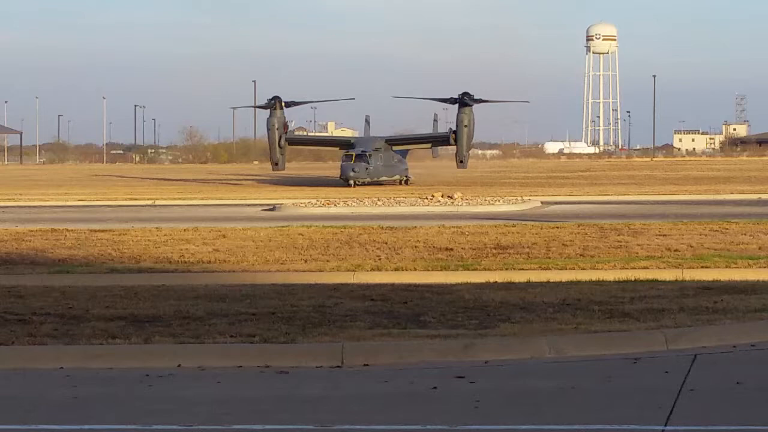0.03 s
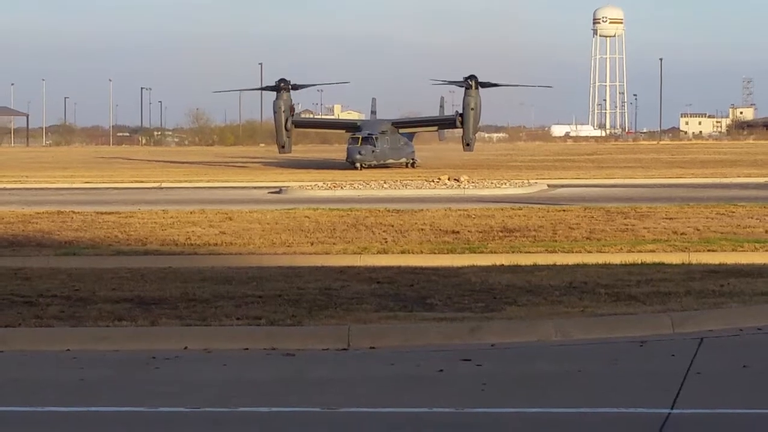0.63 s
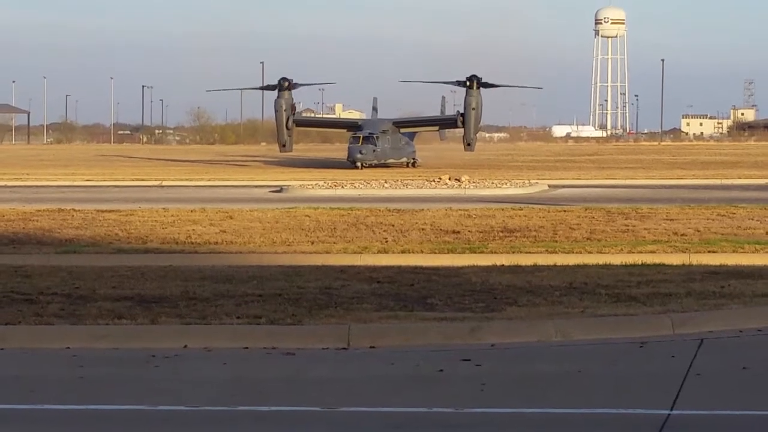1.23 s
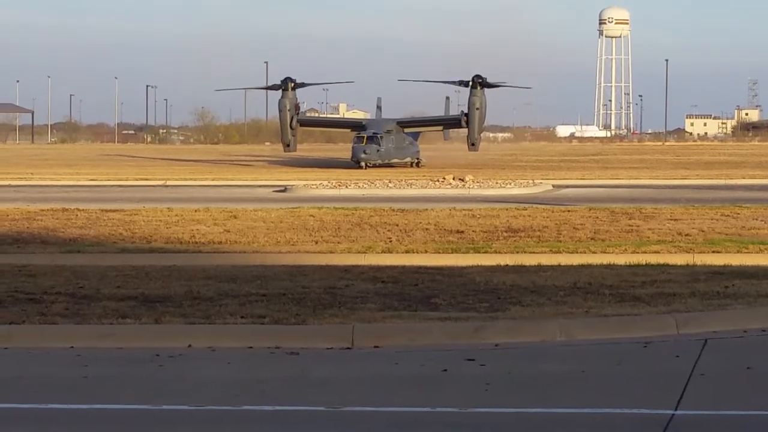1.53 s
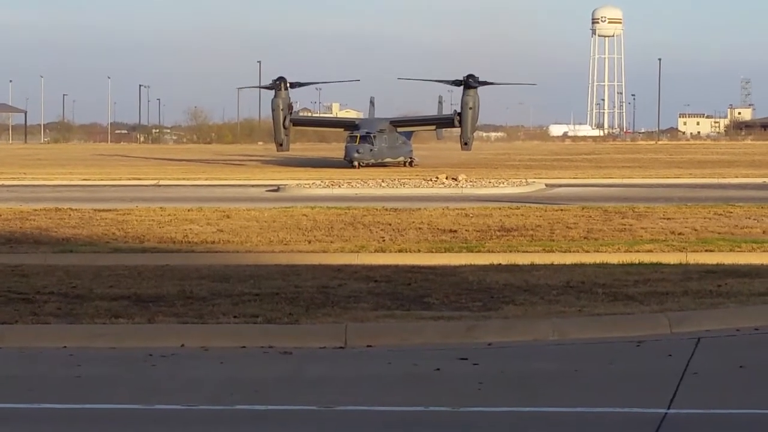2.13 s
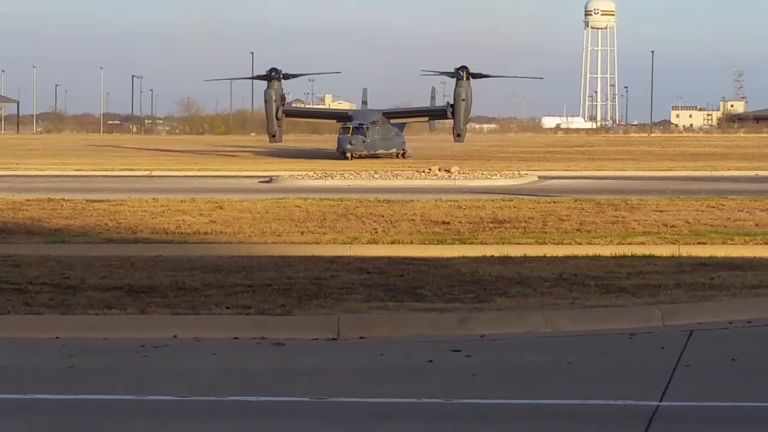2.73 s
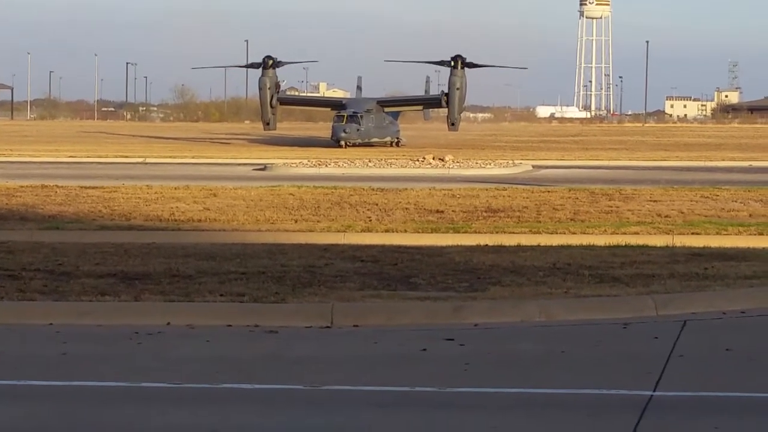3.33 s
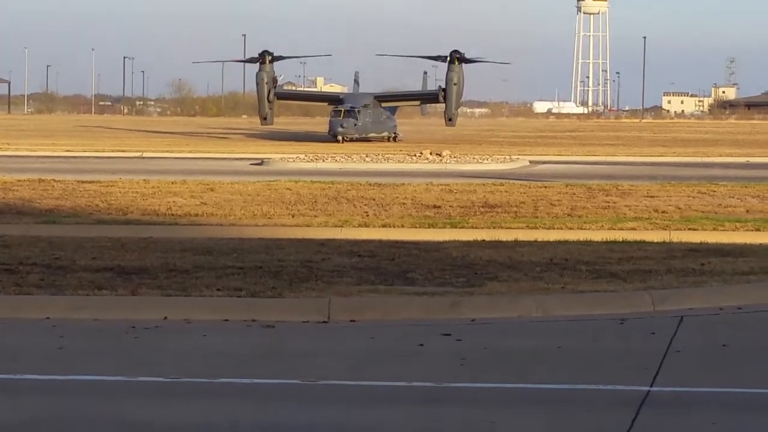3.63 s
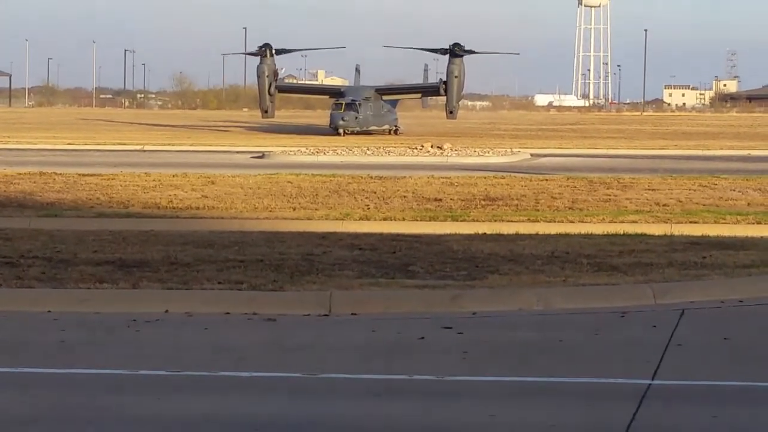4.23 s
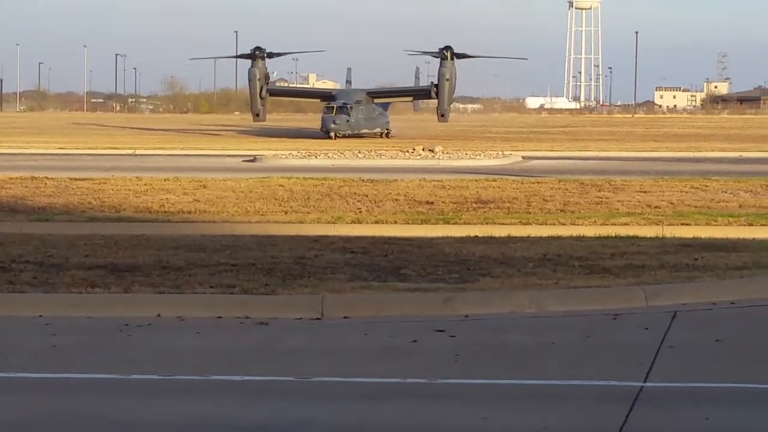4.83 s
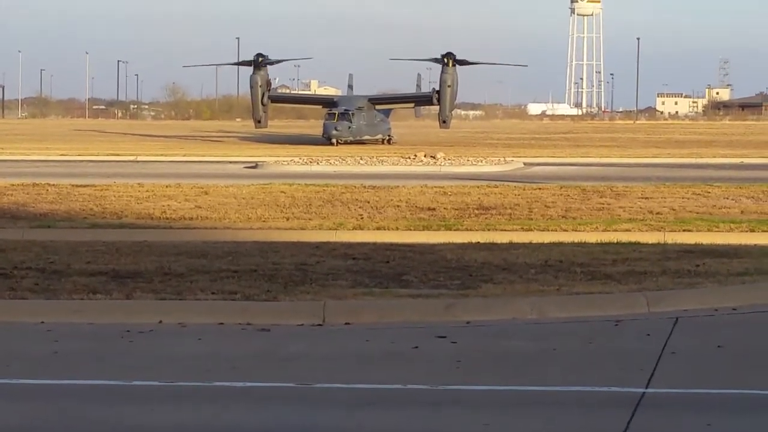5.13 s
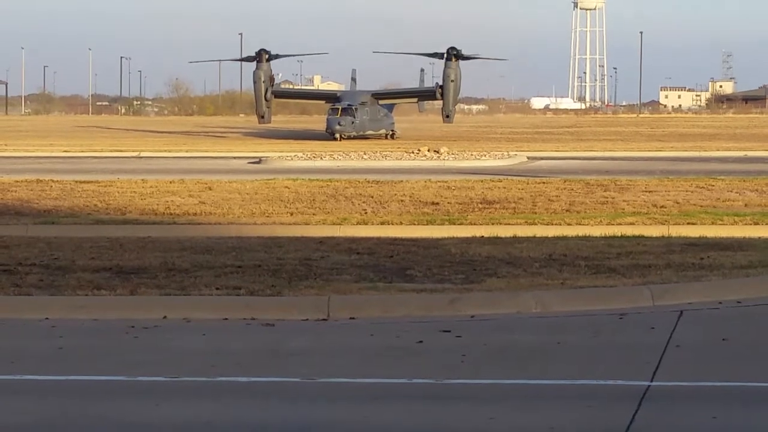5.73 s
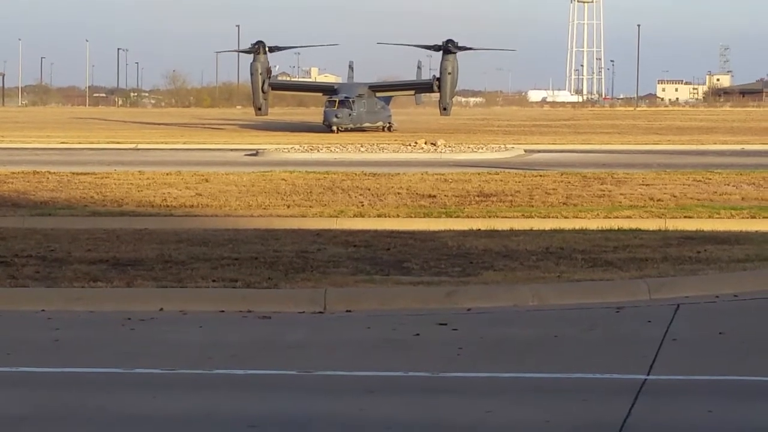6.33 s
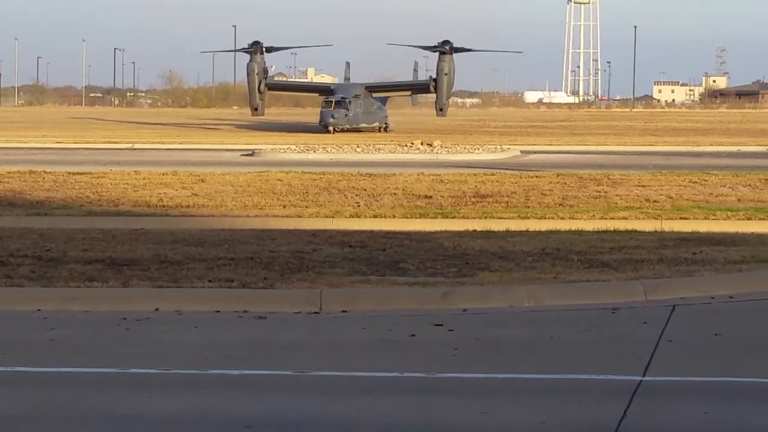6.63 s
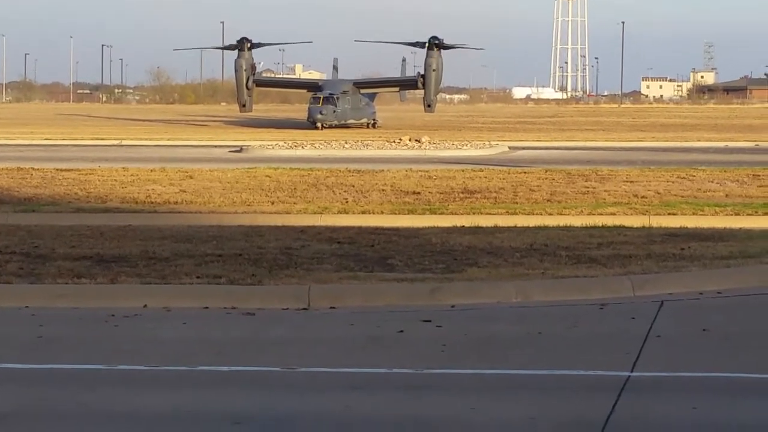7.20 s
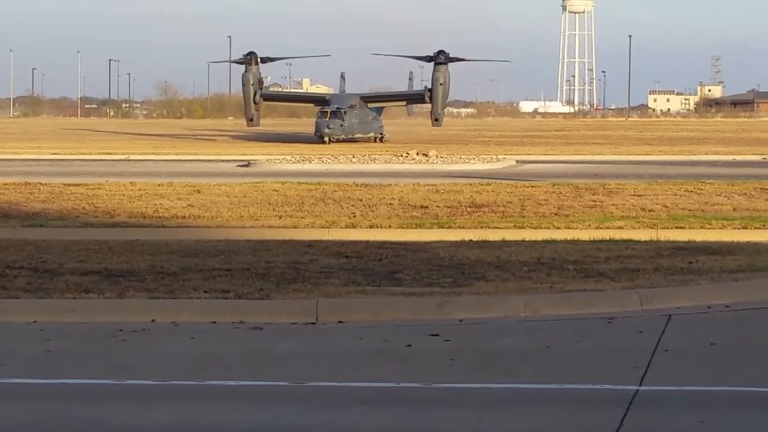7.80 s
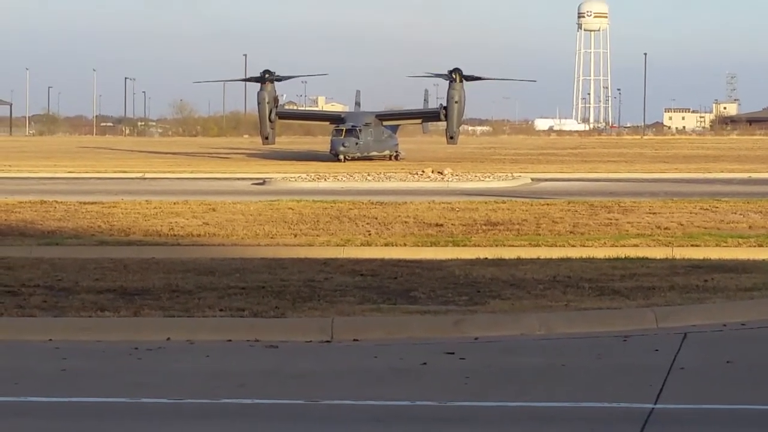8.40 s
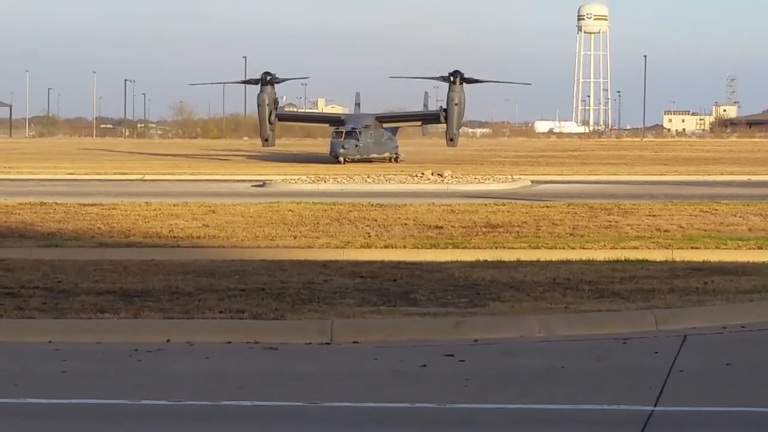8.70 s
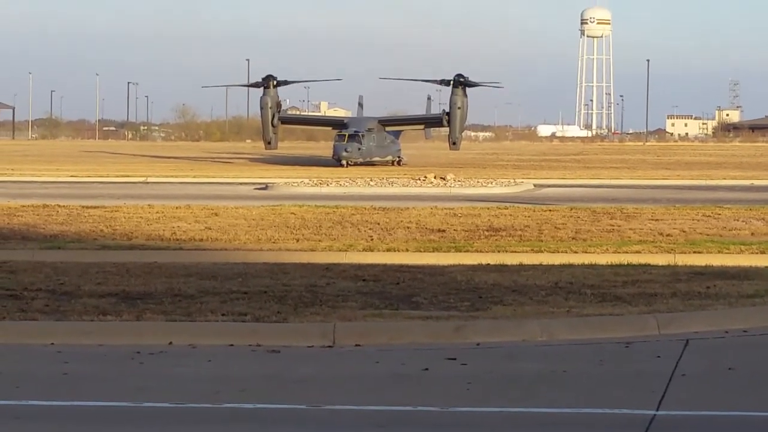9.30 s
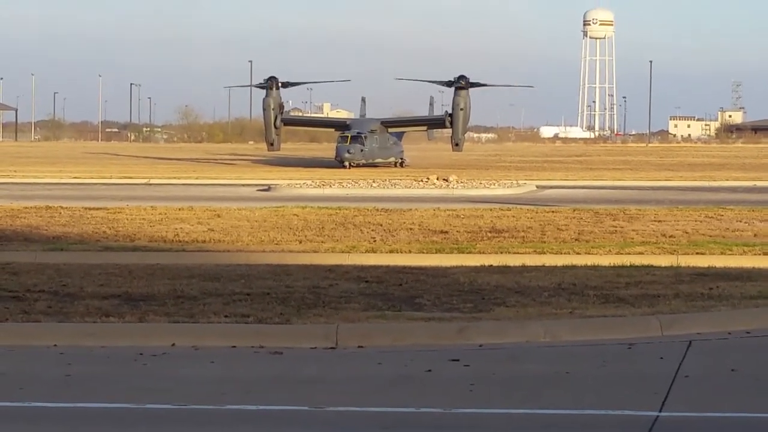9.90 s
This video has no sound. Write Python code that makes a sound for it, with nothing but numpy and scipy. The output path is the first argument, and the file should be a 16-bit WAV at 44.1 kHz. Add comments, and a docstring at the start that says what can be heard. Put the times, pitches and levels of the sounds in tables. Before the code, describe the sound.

After a quick fade-in, the deep, rapid, uneven beat of a tiltrotor aircraft's rotors carries steadily across an open field. Rushing air and turbine hiss sit behind it, with a thin whine that weakens after a few seconds. The blade slaps swell and ease, cracking hardest just past the middle, right after a small click. Wind rumbles softly on the microphone, and the distant rush sounds slightly hollow.

```python
"""A tiltrotor idles some way off on an airfield, its two three-blade rotors thumping in a limping gallop.
Each passing blade pushes out a pulse of air, chops up eddies, swishes and slaps. A shifting crosswind
brings out now one rotor, now the other. Behind them the air pouring off the rotors roars, the turbines
hiss and whine, and a breeze rumbles on the microphone.
The sound fades in at the start, and the beat skips once with a small click."""
import sys
import numpy as np
from scipy import signal
from scipy.fft import rfft, irfft, next_fast_len
from scipy.io import wavfile
from scipy.ndimage import uniform_filter1d, minimum_filter1d

SR = 44100
rng = np.random.default_rng(int(sys.argv[2]) if len(sys.argv) > 2 else 0)


def master_out(mix):
    """Clip the mix to full scale and print it as 16-bit PCM to the path in sys.argv[1]."""
    frames = np.transpose(np.atleast_2d(mix))
    ceiling = np.clip(frames, -1, 1)
    pcm = np.round(ceiling * 32767).astype(np.int16)
    wavfile.write(sys.argv[1], SR, pcm)


N = 438794
TIME = np.arange(N) / SR
FFT_SIZE = next_fast_len(N, real=True)
FREQS = np.fft.rfftfreq(FFT_SIZE, 1 / SR)
SKIP_AT_S, SKIP_LENGTH_S = 5.4233, .0232

# how often a blade of one rotor goes by: (time [s], rate [passes a second])
BLADE_RATE = [(0, 20.52), (1, 20.51), (2, 20.477), (5, 20.477), (7, 20.492), (8, 20.5), (10, 20.5)]
# tone colour of rushing air, before the microphone shapes it: (frequency [Hz], level [dB])
RUSH_COLOUR = [(250, -34.5), (450, -2), (650, 2.5), (1500, 1.5), (1900, -3), (2400, -25.5), (6000, -34.5)]
# tone colour of a blade slap, before the microphone shapes it: (frequency [Hz], level [dB])
SLAP_COLOUR = [(500, -7), (1300, -5), (2000, 7.5), (4200, 8.5), (6500, 5), (10000, 3), (11500, -19.5),
               (14000, -44)]


def rotors(gusty_db):
    """Two rotors geared to one speed; their blades are out of step, so the beat limps."""
    # each rotor in still air: (swish [dB], slap [dB], throb [dB], share of the crosswind's lift [factor])
    still_air = [(-27, -24.7, -23.5, 0.76), (-26, -26, -24, -0.67)]
    # the wind lifts one rotor's noise and sinks the other's: (time [s], lift toward the first rotor [dB])
    crosswind = [(.8, -4), (1.8, -.5), (2.6, 3.5), (3.45, 7), (4.1, 2), (4.8, -4.5), (6.1, -6.5), (6.9, -1),
                 (7.8, 0), (8.4, 5), (9.8, 3)]
    # a rotor slaps harder in its own wake; one list a rotor: (start [s], end [s], boost [dB])
    wake_spells = [
        [(.95, 2.505, 5)],
        [(.5, 1.9, 5), (4.35, 5.22, 5.5), (5.3, 5.76, 8)],
    ]
    # how much the air around the rotors churns: (time [s], throb boost [dB])
    churn = [(.8, 0.7), (2.8, -1), (3.6, -1), (4.9, -0.1), (5.6, -0.4), (6.4, 1), (9.6, 0.1)]
    # one gust thickens the throb of both rotors: (start [s], end [s], boost [dB])
    gust = [(7.95, 8.45, 3)]
    first_passes = (.733, 1.157)  # in blade cycles, like width, lead and lag below
    throb_gain = amp(curve(churn) + spell_db(gust))
    bass, air = np.zeros(N), np.zeros((2, N))
    for first, (swish_db, slap_db, throb_db, share), spells in zip(first_passes, still_air, wake_spells):
        passes = blade_count() - first
        wind_db = share * curve(crosswind) + gusty_db * wander(2.5)
        bass += thump(passes, bass_cut_hz=20, sway_db=-0.35)
        bass += throb_gain * throb(passes, throb_db, memory=0.57, width=0.16, steady=0.47, lag=0.017)
        air += swish(passes, swish_db + wind_db, lead=0.071, width=0.1, flutter_db=1.25)
        air += slap(passes, slap_db + wind_db + spell_db(spells), lead=0.038, width=0.058, flutter_db=1.1)
    return bass * amp([[-.5], [.5]]) + air  # the bass leans slightly right


def thump(passes, bass_cut_hz, sway_db):
    """Each blade pushes out one smooth pulse; the microphone's bass cut adds a dip after it."""
    # the pure tones that make up the pulse: (frequency [Hz], level [dB])
    pulse_colour = [(20, -36), (41, -26), (61, -21.5), (82, -17.5), (102, -20), (123, -22), (143, -26),
                    (164, -26.5), (184, -38.5), (225, -47), (290, -58.5), (400, -63.5)]
    harmonics = np.arange(1, 20)
    hz = harmonics * np.mean(curve(BLADE_RATE))
    cycle = np.linspace(0, 1, 2048)
    angles = 2 * np.pi * np.outer(cycle, harmonics) + np.arctan(bass_cut_hz / hz)
    pulse = np.cos(angles) @ amp(colour_db(pulse_colour, hz))
    return np.interp(passes % 1, cycle, pulse) * amp(sway_db * wander(2.2))


def throb(passes, level_db, memory, width, steady, lag):
    """Blades cutting through swirling air make a low, rough throb."""
    # tone colour of the chopped eddies: (frequency [Hz], level [dB])
    eddy_colour = [(10, -28.5), (30, -26), (60, -5), (105, 0), (145, -0.5), (185, 0.5), (270, -7),
                   (330, -14.5), (420, -20.5), (560, -30.5), (800, -49), (2000, -83)]
    chopped = repeating_noise(memory)[0] * (steady + bell(passes - lag, width))
    return amp(level_db) * coloured(chopped, eddy_colour)


def swish(passes, level_db, lead, width, flutter_db):
    """A soft rush of air comes as each blade swings toward the listener."""
    burst = bell(passes + lead, width) * amp(level_db + flutter_db * wander(8.7))
    return at_microphone(repeating_noise(memory=0.45) * burst, RUSH_COLOUR)


def slap(passes, level_db, lead, width, flutter_db):
    """Each blade tip hits the whirl of air left by the one before, with a short, bright slap."""
    burst = bell(passes + lead, width) * amp(level_db + flutter_db * wander(15))
    return at_microphone(white_noise() * burst, SLAP_COLOUR)


def hard_slaps(level_db, delay_s, width_s):
    """A few blades hit a whirl of air squarely and stand out as cracks."""
    # the square hits: (time [s], relative peak level [dB])
    hits = [(2.201, -11.5), (2.3243, -11), (2.422, -14), (5.1303, -16), (5.5463, -12), (5.5934, -1.5),
            (5.839, -12), (5.938, -10)]
    burst = sum(amp(level_db + db) * np.exp(-.5 * ((TIME - at - delay_s) / width_s) ** 2)
                for at, db in hits)
    return at_microphone(white_noise() * burst, SLAP_COLOUR)


def downwash(level_db, flutter_db):
    """Air pours off the rotors, its level trembling on the way across the field."""
    # strength of the rush: (time [s], relative level [dB])
    strength = [(.8, -27.5), (1.7, -31.5), (2.6, -34.5), (4.0, -27.5), (4.8, -27), (5.6, -31.5), (6.8, -32),
                (7.5, -32), (9.6, -32.5)]
    gain = amp(level_db + curve(strength) + flutter_db * wander(23))
    return at_microphone(white_noise() * gain, RUSH_COLOUR)


def turbines(level_db, flutter_db):
    """The engines hiss, and their compressors add three thin whines."""
    # strength of the hiss: (time [s], relative level [dB])
    strength = [(.8, -25.5), (1.6, -27), (2.7, -29), (3.6, -27.5), (5.4, -28), (6.6, -29.5), (7.9, -28.5),
                (8.35, -27), (8.9, -29)]
    # tone colour of the hiss, before the microphone shapes it: (frequency [Hz], level [dB])
    hiss_colour = [(600, -22.5), (1400, -5), (1900, -3.5), (2200, 0), (3000, 0), (6000, 1), (10000, 2),
                   (10700, -16.5), (11800, -38), (14000, -53)]
    # compressor whine carried on the wind: (time [s], level [dB])
    whine_levels = [(0, -28), (.8, -36), (1.5, -33), (2, -33), (2.5, -36.5), (3.1, -54), (5, -56.5),
                    (10, -53)]
    gain = amp(level_db + curve(strength) + flutter_db * wander(23))
    hiss = at_microphone(white_noise() * gain, hiss_colour)
    whine_db = curve(whine_levels)
    return hiss + whine(2026, whine_db) + whine(1978, whine_db - 8) + whine(2221, -42.0)


def whine(hz, level_db, drift_hz=2.65, fading_db=3):
    """One compressor tone that wavers in pitch and loudness."""
    cycles = np.cumsum(hz + drift_hz * wander(5.4)) / SR
    return amp(level_db + fading_db * wander(5.3)) * np.sin(2 * np.pi * cycles)


def breeze(level_db, gusty_db):
    """Air blowing over the microphone makes a lumpy rumble, unrelated left and right."""
    # tone colour of the rumble: (frequency [Hz], level [dB])
    rumble_colour = [(12, -33), (27, -18.5), (42, -7.5), (80, -5.5), (140, -4.5), (200, -14.5), (280, -20),
                     (400, -28), (800, -51.5), (2000, -93.5)]
    return coloured(white_noise(), rumble_colour) * amp(level_db + gusty_db * wander(6.7))


def skip_click(level_db, decay_s):
    """A small, sharp click where the beat skips."""
    age = TIME - SKIP_AT_S
    return amp(level_db) * (age >= 0) * np.exp(-abs(age) / decay_s)


def at_microphone(noises, colour):
    """Gives two noises a tone colour, plus the hollow sound of the microphone's two openings."""
    # how the openings hear distant noise:
    # (frequency [Hz], left level [dB], right level [dB], likeness [0-1], left lead [radians])
    openings = [(450.0, -10.7, -10.7, 0.84, 0.1), (570.0, -14.9, -13.2, 0.74, -0.1),
                (760.0, -5.6, -3.4, 0.96, -0.0), (1180.0, -7.0, -3.9, 0.92, 0.1),
                (1430.0, -13.6, -9.7, 0.51, 0.2), (1620.0, -10.3, -8.8, 0.56, 0.8),
                (1880.0, -13.3, -13.9, 0.37, -3.1), (2020.0, -5.2, -6.1, 0.74, -0.6),
                (2230.0, -0.1, -1.7, 0.94, -0.3), (2420.0, -2.9, -4.3, 0.9, -0.3),
                (2650.0, -11.1, -9.0, 0.75, -0.2), (2850.0, -19.8, -9.7, 0.3, 1.1),
                (3250.0, -20.1, -6.4, 0.7, -1.9), (3750.0, -26.1, -8.2, 0.58, -2.5),
                (4250.0, -23.8, -6.2, 0.79, 0.1), (4650.0, -28.6, -13.2, 0.34, -2.8),
                (4950.0, -26.1, -15.5, 0.62, 1.1), (5450.0, -27.9, -22.1, 0.18, -1.1),
                (5900.0, -28.0, -18.1, 0.29, 2.0), (6450.0, -20.7, -14.5, 0.72, -0.1),
                (6900.0, -24.1, -17.5, 0.6, -0.4), (7250.0, -29.6, -26.9, 0.19, 2.0),
                (7800.0, -31.4, -20.1, 0.46, -0.3), (8250.0, -31.2, -28.3, 0.21, -2.8),
                (8800.0, -38.9, -24.6, 0.2, 0.3), (9400.0, -34.1, -32.9, 0.18, -2.0),
                (9900.0, -36.8, -36.3, 0.18, 1.7), (10600.0, -51.1, -43.4, 0.2, 0.1)]
    hz, _, _, likeness, lead = np.transpose(openings)
    shared = np.interp(FREQS, hz, np.clip(likeness, 0, .99) * np.exp(-1j * lead))
    sides_db = [colour_db(openings, FREQS, column) for column in (1, 2)]
    gains = evened(amp(sides_db + colour_db(colour, FREQS)))
    left, other = rfft(noises, FFT_SIZE)
    right = shared * left + np.sqrt(1 - abs(shared) ** 2) * other  # partly the same noise as the left
    return irfft(gains * [left, right], FFT_SIZE)[:, :N]


def blade_count():
    """Counts blade passes from the start, jumping ahead where the beat skips."""
    rate = curve(BLADE_RATE)
    return np.cumsum(rate) / SR + rate.mean() * SKIP_LENGTH_S * (TIME > SKIP_AT_S)


def bell(passes, width):
    """A smooth bump of height 1 around each blade pass; width is a share of one cycle."""
    return np.exp(-.5 * (((passes + .5) % 1 - .5) / width) ** 2)


def repeating_noise(memory):
    """Two noises that partly repeat with each pass, as the next blade cuts the same eddies."""
    period = round(SR / np.mean(curve(BLADE_RATE)))
    fresh = rng.standard_normal((2, N // period + 1, period))
    carried_over = signal.lfilter([1], [1, -memory], fresh, axis=1)
    return evened(carried_over.reshape(2, -1)[:, :N])


def spell_db(spells, edge_s=0.17):
    """A boost in dB that swells and dies away with each spell."""
    return sum(db * .5 * (np.tanh((TIME - start) / edge_s) - np.tanh((TIME - end) / edge_s))
               for start, end, db in spells)


def wander(hz):
    """A random wobble of typical size 1, moving up to about hz times a second."""
    slow = rfft(rng.standard_normal(FFT_SIZE)) * np.exp(-(FREQS / hz) ** 2)
    return evened(irfft(slow, FFT_SIZE)[:N])


def white_noise():
    """Two unrelated white noises."""
    return rng.standard_normal((2, N))


def coloured(noise, colour):
    """Gives noise a tone colour and a typical size of 1."""
    spectrum = rfft(noise, FFT_SIZE) * amp(colour_db(colour, FREQS))
    return evened(irfft(spectrum, FFT_SIZE)[..., :N])


def colour_db(rows, hz, column=1):
    """Looks up a tone colour's level at the given frequencies."""
    rows = np.asarray(rows)
    return np.interp(np.log(hz + 1), np.log(rows[:, 0] + 1), rows[:, column])


def curve(rows):
    """Joins a table's (time, value) points with straight lines."""
    return np.interp(TIME, *np.transpose(rows))


def evened(x):
    """Scales a signal to a typical size (rms) of 1."""
    return x / np.sqrt(np.mean(x ** 2) + 1e-20)


def amp(db):
    """Turns decibels into a gain."""
    return 10 ** (np.asarray(db) / 20)


def scene():
    """Rotors, their downwash and the engines, a breeze on the microphone, and one click."""
    blades = rotors(gusty_db=0.53) + hard_slaps(level_db=-4.5, delay_s=0.0023, width_s=0.0011)
    roar = downwash(level_db=-1.0, flutter_db=1.45) + turbines(level_db=2.18, flutter_db=0.91)
    return blades + roar + breeze(level_db=-25.5, gusty_db=0.9) + skip_click(level_db=-1, decay_s=.00006)


def record(dry):
    """Eases the level down around loud peaks, fades in from silence and cuts the highest treble."""
    ceiling, fade_span_s, top_hz = .96, (0.41, .70), 16200
    safe_gain = np.minimum(1, ceiling / (abs(dry).max(0) + 1e-9))
    smooth_gain = uniform_filter1d(minimum_filter1d(safe_gain, size=601), size=301)
    fade_in = np.interp(TIME, fade_span_s, [0, 1])
    treble_cut = signal.firwin(511, top_hz, window=("kaiser", 9), fs=SR)
    return signal.oaconvolve(dry * smooth_gain * fade_in, treble_cut[None], "same")


dry = scene()
out = record(dry)
master_out(out)
```